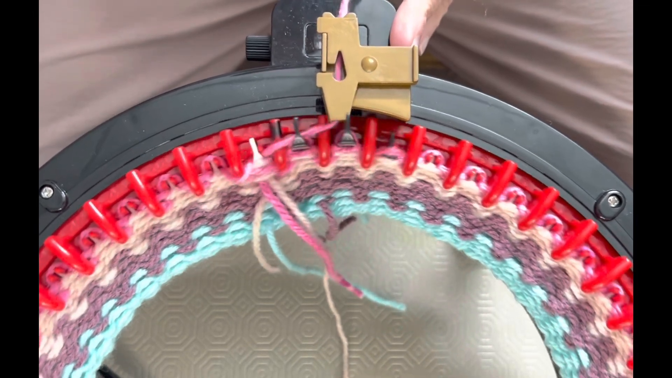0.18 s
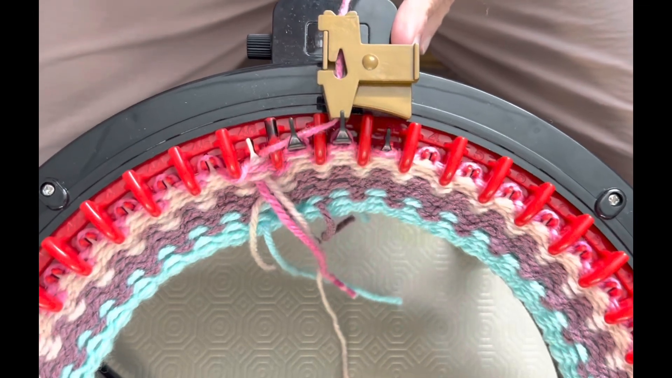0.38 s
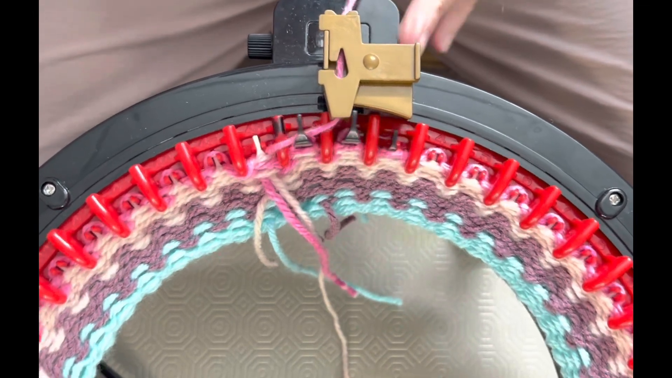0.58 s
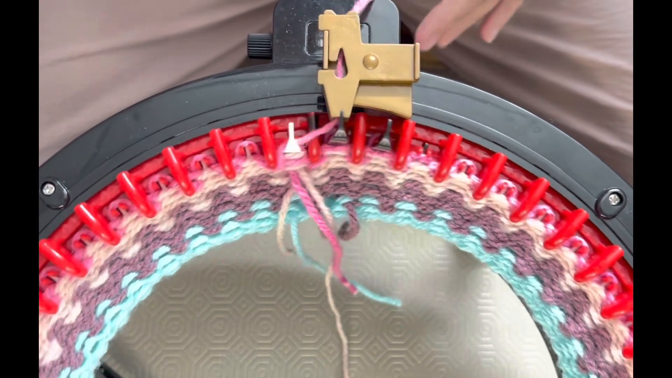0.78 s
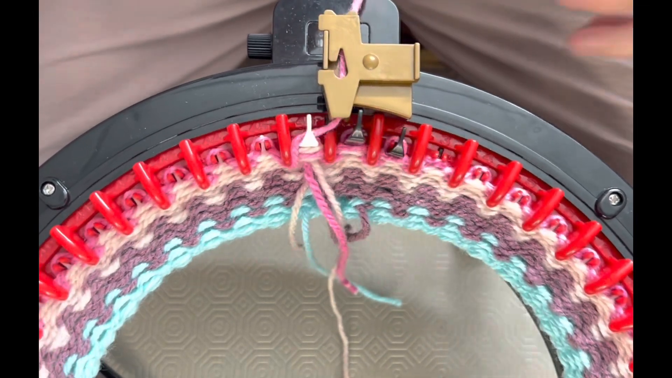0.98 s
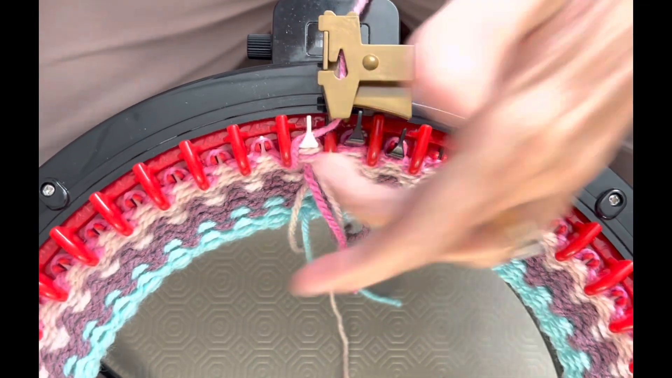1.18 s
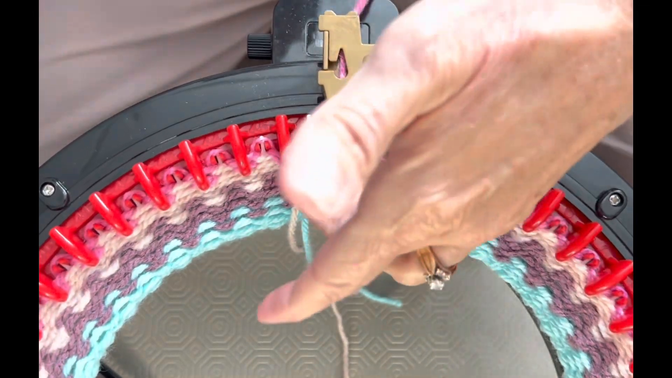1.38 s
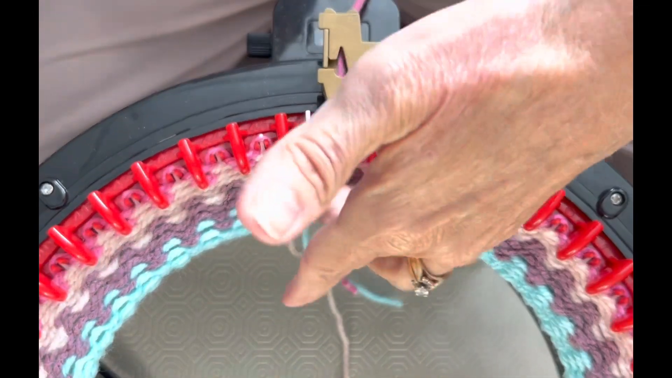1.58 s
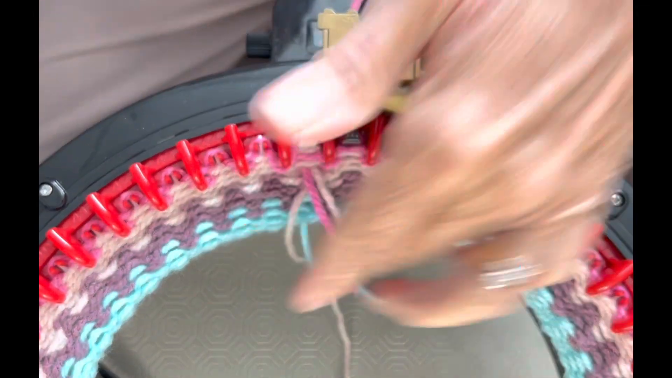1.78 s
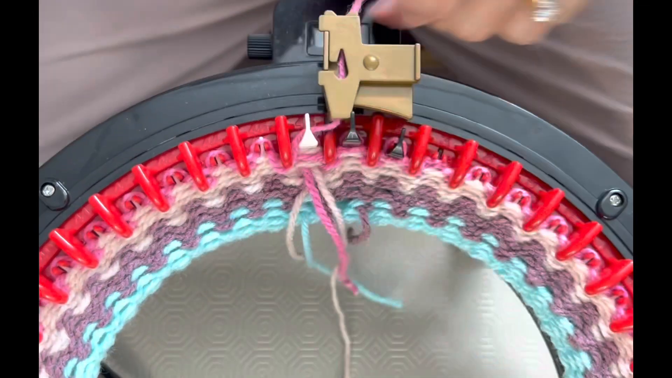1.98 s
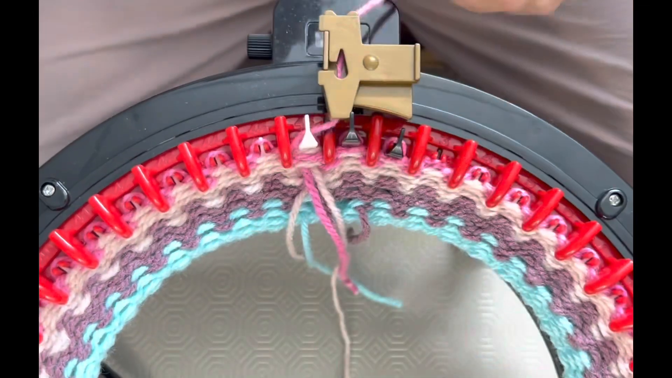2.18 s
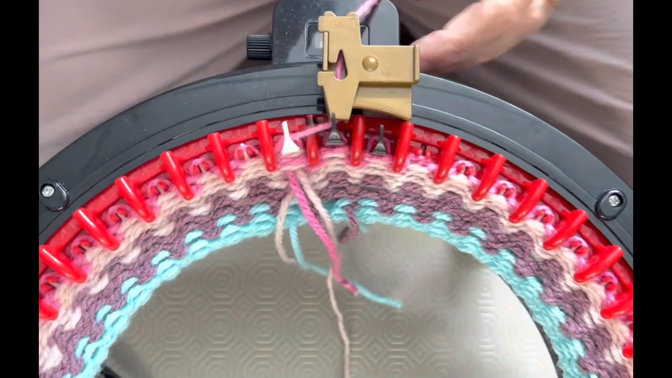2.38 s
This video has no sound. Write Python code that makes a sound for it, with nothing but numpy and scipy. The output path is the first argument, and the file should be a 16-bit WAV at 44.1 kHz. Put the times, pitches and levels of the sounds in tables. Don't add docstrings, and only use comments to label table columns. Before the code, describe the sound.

A hollow plastic clack and needle rattle from a hand-turned knitting machine, then small quiet clicks

```python
import sys
import numpy as np
from scipy import signal
from scipy.fft import rfft, irfft
from scipy.io import wavfile
from scipy.ndimage import uniform_filter1d

SR = 44100
rng = np.random.default_rng(int(sys.argv[2]) if len(sys.argv) > 2 else 0)


def bounce(signal):
    frames = np.transpose(np.atleast_2d(signal))
    limited = np.clip(frames, -1, 1)
    pcm = np.round(limited * 32767).astype(np.int16)
    wavfile.write(sys.argv[1], SR, pcm)


def decibels_to_gain(level_db):
    exponent = np.asarray(level_db, float) / 20
    return 10 ** exponent


N = 105840

# start_s, level_db, brightness_db
RUBBING = [(0,-52.5,4.5),(0.198,-53.5,4),(.36,-53,-0.5),(.5,-63.5,-10.5),(0.564,-54.5,-3.5),(0.592,-51.5,7),(0.799,-50.5,0),(0.954,-57.5,-3),(1.023,-79,-0.5),(1.459,-91,3),(1.56,-74.5,4.5),(1.752,-59.5,-7),(1.9,-85.5,0.5),(2.102,-81.5,-9.5),(2.132,-60.5,-10),(2.249,-55,-14),(2.309,-58.5,12.5),(2.4,-54.5,-9)]
# pitch_hz, level_db (per Hz)
RUB_TONE = [(50,-10),(300,3.5),(1000,0),(2400,-5),(4500,-11.5),(7000,-17.5),(11400,-24.5),(14500,-25)]
# pitch_hz, level_db, fade_s (to -60 dB)
RING_NOTES = [(275, -8.5, 0.048), (420, -9.5, 0.17), (514.5, -2.5, 0.059), (710, -14.5, 0.21),
              (1320, -21.5, 0.049), (1600, -27, 0.19), (1600, -27.5, 0.12), (2730, -28, 0.16)]
# pitch_hz, level_db (per Hz)
AIR_TONE = [(15, -39), (25, -8.5), (223, 6), (416, -9.5), (1330, -22.5), (1790, -23), (10100, -35),
            (11300, -38), (16000, -43)]
# pitch_hz, lead_radians
PORT_LEAD = [(0,0),(750,-.8),(1500,0),(2450,2.5),(3600,1.5),(4910,1.7),(7060,5.7),(16500,17.5)]
# pitch_hz, difference_db
PORT_LEAN = [(60,0),(250,1.5),(700,1.5),(2400,-1.5),(8000,0)]
# start_s, peak_db, pitch_hz, fade_s
NEEDLE_PINGS = [(.034,-45.5,3140,0.027),(.2105,-23,4770,0.015),(.2225,-19,4950,0.019),(.235,-24,5220,0.059),(.259,-47,1350,0.027),(.273,-35,800,0.02),(.4,-23,1216,0.031),(.5308,-45,1113,0.014),(.544,-53.5,3400,.02),(.5677,-41.5,3040,0.013),(.5792,-38.5,3310,0.032),(.598,-39,2400,.03),(.6191,-31,2381,0.03),(.6416,-37,1100,0.01),(.695,-45.5,1500,0.034),(.7693,-41.5,1270,0.032),(.779,-43.5,1600,0.057),(.8326,-46.5,3230,0.014),(.89,-45,930,0.03),(.93,-46,696,0.025),(.9568,-49.5,1250,0.0199),(1.0442,-67.5,4020,0.021),(1.0792,-61,609,0.068),(1.4822,-44.5,910,0.041),(1.498,-49.5,647,0.096),(1.546,-63,6060,0.016),(1.6,-43.5,1590,0.043),(1.675,-54.5,3100,0.022),(1.7102,-60.5,1200,0.022),(1.7501,-48,690,0.046),(1.997,-50,884,0.026),(2.03,-60.5,2896,.012),(2.04,-49.5,300,.06),(2.1268,-62,7440,.02),(2.1417,-58.5,7000,.02),(2.19,-59,1760,0.0168),(2.234,-55,2130,0.017),(2.2425,-48,2390,0.016),(2.252,-49.5,2730,.02),(2.266,-51,5140,0.024),(2.3109,-43,1330,.03),(2.314,-39,2450,.02),(2.319,-38,910,0.025),(2.33,-47.5,7000,0.013),(2.352,-44.5,974,.03),(2.388,-45.5,2900,0.024),(2.392,-51,1200,0.024)]
# start_s, peak_db, pitch_hz, fade_s
RING_KNOCKS = [(.035,-44.5,800,0.014),(.044,-41.5,580,0.047),(.1,-56,613,.05),(0.14,-35.5,679,0.015),(0.2094,-25.5,980,0.021),(.2215,-10.5,614,0.025),(.227,-19,594.5,0.069),(0.2284,-13,420,0.04),(0.2343,-14,530,0.022),(.238,-15.5,414.6,0.06),(0.3993,-25.5,840,0.018),(0.4,-17,412.3,0.043),(.572,-43.5,630,0.042),(0.613,-32,434,0.015),(0.619,-35.5,420,.04),(.642,-37.5,710,0.015),(.651,-38,420,0.031),(.7,-38.5,404,0.0466),(0.766,-58,465,0.12),(0.798,-38,438,0.016),(1.249,-56,866,0.0221),(1.299,-48,600.5,0.019),(1.617,-36,421,0.027),(1.722,-52.5,570,0.039),(1.995,-42.5,731,0.039),(2.004,-44.5,641,0.053),(2.037,-57.5,383.4,0.081),(2.149,-49,410,0.15),(2.308,-46.5,946,0.079)]
# start_s, peak_db
LAP_THUMPS = [
    (0.227,-24.5),
    (.43,-45.5),
    (0.701,-45),
    (0.81,-52.5),
    (1.997,-51),
]
# start_s, peak_db, pitch_hz, crack_db, fade_s
NEEDLE_TICKS = [(0.2091,-26.5,4370,7.5,0.062),(0.2212,-13,2660,8.5,0.032),(0.3858,-38,1700,-10.5,0.068),(0.398,-26.5,2050,-19,0.039),(0.5304,-49,2020,-30,0.042),(0.5788,-35.5,3390,-4,0.31),(0.5794,-36.5,7800,2,0.015),(0.6183,-31,2570,2,0.025),(0.635,-39.5,3870,-8,0.044),(0.6624,-37,2150,4,0.018),(0.699,-23.5,4400,-6,0.011),(0.7223,-38.5,3470,0,0.06),(0.8339,-44.5,3160,-10,0.0255),(0.89,-35.5,2510,-21,0.016),(2.266,-40,2700,-7.5,0.024),(2.277,-38.5,3140,-6,0.061),(2.291,-32.5,2820,-17,0.032),(2.3291,-26.5,2000,-6,0.019),(2.346,-40,1510,-28,0.026),
                (1.0792,-57,2510,-14,0.12),(1.2968,-54.5,2403,-13,0.061),(1.481,-42.5,2300,-16.5,0.04),(1.4958,-46,1910,-24,0.051),(1.591,-46,2155,1,0.087),(1.6018,-29,3480,-2,0.025),(1.664,-53.5,2890,4.5,0.042),(1.7341,-48.5,941,-0.5,0.096),(1.748,-45,2190,5,0.059),(1.8438,-55.5,2370,-3.5,0.069),(1.9963,-51,2890,-0.5,0.014),(2.107,-51.5,7170,-8,0.52),(2.1543,-43.5,1427,-10,0.018)]
# pitch_hz, level_db (per Hz)
CRACK_TONE = [(250,-13),(500,-3),(2400,-2.5),(4500,-10),(8500,-13.5),(11400,-19),(13400,-11.5),(16000,-19.5)]
# pitch_hz, fade_s
ROOM_FADE = [(100,.3),(500,.24),(2000,.19),(5000,.15),(14000,.14)]
# pitch_hz, width_hz, depth_db
TREBLE_DIPS = [(5650, 280, -9), (10300, 600, -10)]

RUB_TOP_HZ = 14300


def evened(x):
    return x / np.sqrt(np.mean(x ** 2) + 1e-20)


def read(points, hz):
    f, value = np.transpose(points)
    return np.interp(np.log(hz + 1), np.log(f + 1), value)


def add(mix, start_s, sound):
    part = mix[round(start_s * SR):][:len(sound)]
    part += sound[:len(part)]


def colour(x, gain):
    hz = np.fft.rfftfreq(x.shape[-1], 1 / SR)
    return irfft(rfft(x) * gain(hz), x.shape[-1])


def fade(t, fade_s):
    return decibels_to_gain(-60 * t / max(fade_s, .004))


def mode(t, hz, fade_s):
    return np.sin(2 * np.pi * hz * t) * fade(t, fade_s)


def wander(per_s):
    return evened(colour(rng.standard_normal(N), lambda hz: 1 / (1 + (hz / per_s) ** 4)))


def ring(detune=1):
    t = np.arange(6000) / SR
    return sum(decibels_to_gain(db) * mode(t, hz * detune, min(fade_s, .06)) for hz, db, fade_s in RING_NOTES)


def patchy(x):
    patch_db = 2.5
    z = signal.stft(x, nperseg=256)[2]
    spots = uniform_filter1d(rng.standard_normal(z.T.shape), size=7, axis=0)
    spots = evened(uniform_filter1d(spots, size=4, axis=1))
    return signal.istft(z * decibels_to_gain(patch_db * spots.T), nperseg=256)[1][:N]


def grind():
    slips_per_s, slip_spread_db, clump_db = 660, 2, 1
    slip_ring_db, pivot_hz = -13, 1200
    start_s, level_db, bright_db = np.transpose(RUBBING)
    t = np.arange(N) / SR
    size = decibels_to_gain(slip_spread_db * np.minimum(rng.exponential(1, N), 2))
    size = size * (rng.random(N) < slips_per_s / SR)
    slips = evened(size * rng.standard_normal(N)) + 1.2 * rng.standard_normal(N)
    slips = patchy(slips * decibels_to_gain(clump_db * wander(47)))
    rub = evened(colour(slips, lambda f: decibels_to_gain(read(RUB_TONE, f)) / (1 + (f / RUB_TOP_HZ) ** 40)))
    high = colour(rub, lambda f: f ** 2 / (f ** 2 + pivot_hz ** 2))
    frame = evened(signal.oaconvolve(slips, ring())[:N])
    body = rub - high + decibels_to_gain(slip_ring_db) * frame
    bright = high * decibels_to_gain(np.interp(t, start_s, bright_db))
    return decibels_to_gain(np.interp(t, start_s, level_db)) * (body + bright)


def rumble():
    rumble_db, rumble_hz, lump_db, follow = -72, 93, 5.5, 0.13
    start_s, level_db, _ = np.transpose(RUBBING)
    low = evened(colour(rng.standard_normal(N), lambda f: f / (1 + (f / rumble_hz) ** 3)))
    crank_db = np.interp(np.arange(N) / SR, start_s, level_db) + 71
    return low * decibels_to_gain(rumble_db + lump_db * wander(15) + follow * crank_db)


def ports(x):
    def half(f):
        lead = np.interp(f, *np.transpose(PORT_LEAD))
        return np.exp(.5j * lead) * decibels_to_gain(.5 * read(PORT_LEAN, f))
    return np.array([colour(x, half), colour(x, lambda f: 1 / half(f))])


def air():
    air_db, drift_db = -70, 1.7
    shared, left, right = rng.standard_normal((3, N))
    own = .5 * colour(np.array([left, right]), lambda f: f / np.sqrt(f ** 2 + 300 ** 2))
    tone = evened(colour(ports(shared) + own, lambda f: decibels_to_gain(read(AIR_TONE, f))))
    return decibels_to_gain(air_db + drift_db * wander(5.4)) * tone


def pings():
    rough, width, rise_s = 1.2, .3, .0007
    out, t = np.zeros(N), np.arange(4000) / SR
    noises = rng.standard_normal((len(NEEDLE_PINGS), 4000))
    for (start_s, db, hz, fade_s), noise in zip(NEEDLE_PINGS, noises):
        skirt = evened(colour(noise, lambda f: f / hz / (1 + ((f - hz) / (width * hz)) ** 2)))
        ping = mode(t, hz, fade_s) + rough * skirt * fade(t, fade_s)
        add(out, start_s, decibels_to_gain(db - 4) * ping * np.minimum(t / rise_s, 1))
    return out


def knocks():
    rough, width, rise_turns, low_cut_hz = .45, 0.19, 0.39, 300
    ring_db, after_db, after_fade_s = -16.5, -14.5, 0.14
    out, t = np.zeros(N), np.arange(6000) / SR
    noises = rng.standard_normal((len(RING_KNOCKS), 6000))
    for (start_s, db, hz, fade_s), noise in zip(RING_KNOCKS, noises):
        def near(f):
            slope = (f / hz) ** 2 / (1 + (f / hz / 3) ** 2)
            return slope / (1 + ((f - hz) / (width * hz)) ** 2)
        cloud = rough * evened(colour(noise, near))
        cloud = cloud * (.5 * decibels_to_gain(-60 * t / fade_s) + decibels_to_gain(after_db - 60 * t / after_fade_s))
        blow = mode(t, hz, fade_s) + cloud + decibels_to_gain(ring_db) * ring(1 + 0.024 * noise[0])
        blow = blow * (1 - np.exp(-t * hz / rise_turns)) ** 2
        add(out, start_s, decibels_to_gain(db) * blow / abs(blow).max())
    out = colour(out, lambda f: 1 / np.sqrt(1 + (low_cut_hz / (f + 1)) ** 6))
    thump = mode(t, 121.4, 0.17) + decibels_to_gain(-17) * mode(t, 55, 0.17)
    thump = thump * np.minimum(t / .015, 1)
    for start_s, db in LAP_THUMPS:
        add(out, start_s, decibels_to_gain(db) * thump)
    return out


def ticks():
    rattle_width, crack_top, crack_s = 0.31, 6, 0.003
    rise_s, swell = .0015, .1
    out, t, rows = np.zeros(N), np.arange(12000) / SR, NEEDLE_TICKS
    noises = rng.standard_normal((len(rows), 2, 12000))
    for (start_s, db, hz, crack_db, fade_s), noise in zip(rows, noises):
        def near(f):
            return np.minimum(2 * f / hz, 1) ** 2 / (1 + ((f - hz) / (rattle_width * hz)) ** 2)

        def wide(f):
            return decibels_to_gain(read(CRACK_TONE, f)) / np.sqrt(1 + (f / (crack_top * hz)) ** 4)
        rattle = evened(colour(noise[0], near))
        crack = evened(colour(noise[1], wide))
        snap = (rattle + decibels_to_gain(crack_db) * crack) * (0.66 + np.exp(-t / crack_s)) * fade(t, fade_s)
        add(out, start_s, decibels_to_gain(db - 6) * snap * np.minimum(t / (rise_s + swell * fade_s ** 2), 1))
    return out


def shake():
    start_s, level_db, hold_s, fade_s = .2225, -16.5, 0.0047, 0.14
    tilt_db, split_hz, high_fade_s = -3, 8700, .15
    out, t = np.zeros(N), np.arange(12000) / SR
    strength = 3.3 + (rng.random(12000) < .03) * rng.exponential(1.0, 12000)
    hits = rng.standard_normal(12000) * strength
    chatter = evened(colour(hits, lambda f: decibels_to_gain(read(CRACK_TONE, f) + tilt_db * np.log2(f / 1000 + 0.27))))
    high = colour(chatter, lambda f: f ** 4 / (f ** 4 + split_hz ** 4))
    low = chatter - high
    high = colour(high, lambda f: 1 / (1 + (f / RUB_TOP_HZ) ** 40)) * decibels_to_gain(-60 * t / high_fade_s)
    fade_db = -60 * np.maximum(t - hold_s, 0) / fade_s
    add(out, start_s, (low + high) * decibels_to_gain(level_db + fade_db) * np.minimum(t / 0.002, 1))
    return out


def room(x):
    same = 0.23
    taps = np.zeros((2, SR // 2))
    at = np.arange(120, SR // 2 - 20, 20) + rng.integers(0, 20, (2, (SR // 2 - 121) // 20))
    np.put_along_axis(taps, at, rng.choice([-1., 1.], at.shape), 1)
    hz, t, z = signal.stft(taps, SR, nperseg=256)
    dying = decibels_to_gain(-60 * t / read(ROOM_FADE, hz)[:, None])
    echoes = signal.istft(z * dying, SR, nperseg=256)[1]
    echoes = echoes / np.linalg.norm(echoes[0])
    tail = signal.fftconvolve(x[None], echoes, axes=1)[:, :N]
    own = colour(tail, lambda f: f / np.sqrt(f ** 2 + 400 ** 2))
    return same * ports(tail[0]) + np.sqrt(1 - same ** 2) * own


def scene():
    machine = grind() + rumble() + pings() + knocks() + ticks() + shake()
    return ports(machine) + decibels_to_gain(-12) * room(machine) + air()


def top_cut(x):
    return signal.sosfilt(signal.butter(12, 17160, fs=SR, output="sos"), x)


def record(dry):
    low_hz, edge_hz = 44.8, 16100
    heard = colour(dry, lambda f: f ** 2 / (f ** 2 + low_hz ** 2) / (1 + (f / edge_hz) ** 60))

    def hollows(f):
        return decibels_to_gain(sum(db * np.exp(-((f - hz) / width) ** 2) for hz, width, db in TREBLE_DIPS))
    return top_cut(colour(heard, hollows))


dry = scene()
out = record(dry)
bounce(out)
```